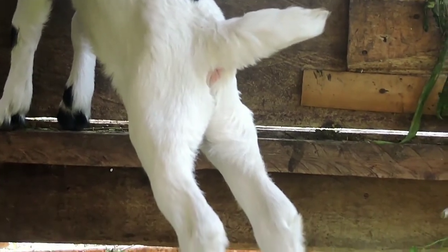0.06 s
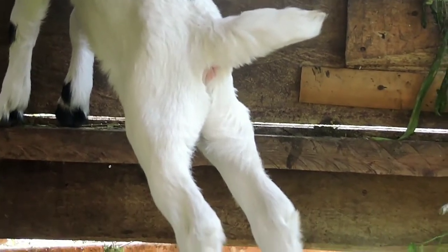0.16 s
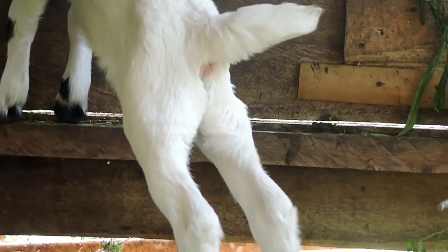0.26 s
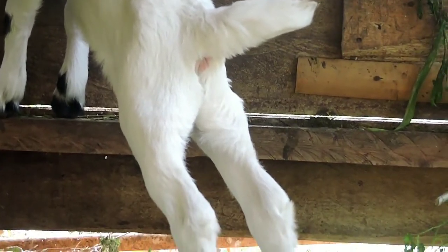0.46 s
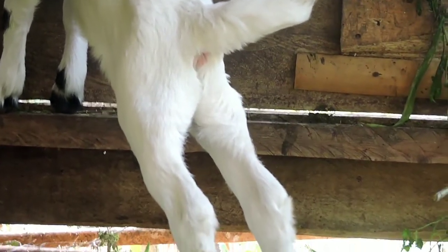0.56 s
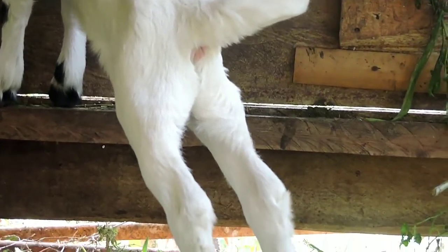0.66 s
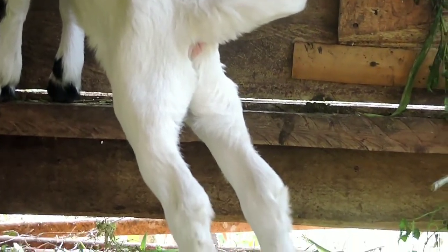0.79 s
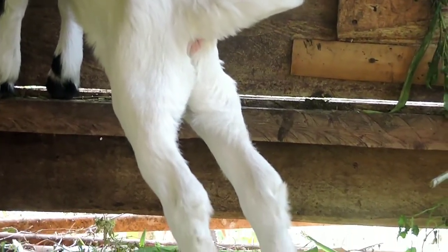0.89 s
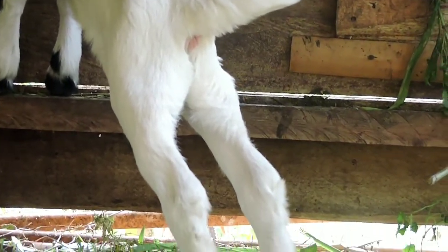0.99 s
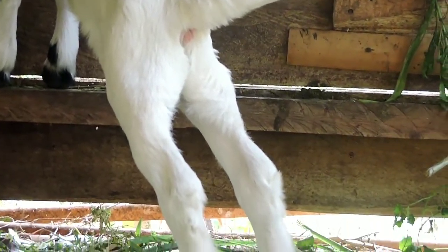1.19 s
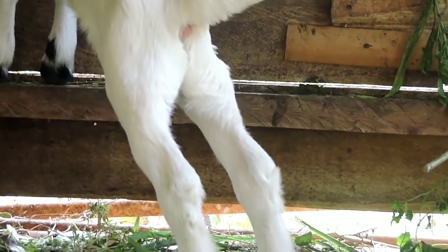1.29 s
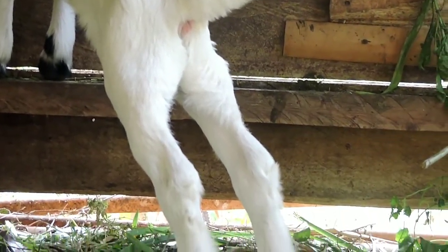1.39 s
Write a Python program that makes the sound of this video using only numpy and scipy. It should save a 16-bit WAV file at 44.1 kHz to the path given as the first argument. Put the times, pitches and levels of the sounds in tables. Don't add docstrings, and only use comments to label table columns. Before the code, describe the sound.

Two goat kids give short, trembling overlapping bleats in a wooden pen, followed by small hoof clicks.

```python
import sys
import numpy as np
from scipy import signal
from scipy.fft import rfft, irfft, next_fast_len
from scipy.io import wavfile
from scipy.ndimage import uniform_filter1d, map_coordinates

SR = 44100
rng = np.random.default_rng(int(sys.argv[2]) if len(sys.argv) > 2 else 0)


def convert_level_to_amplitude(level_db):
    exponent = np.asarray(level_db, float) / 20
    return 10 ** exponent


def inscribe(sig):
    pcm = np.round(np.clip(np.atleast_2d(sig).T, -1, 1) * 32767)
    wavfile.write(sys.argv[1], SR, pcm.astype(np.int16))


N = 63945
T = np.arange(N) / SR

# t/s, mean pitch f/Hz, level/dB, low resonances over
# middle/dB, top resonances over middle/dB
KID_BLEAT = [
    (.1, 400, -61, -20, -4),
    (.122, 396.5, -58, -20, 2),
    (.183, 421.4, -49, -9, -5),
    (.203, 432.7, -36, -13, -14),
    (.214, 448.9, -53.5, 4, -4),
             (0.241, 467.7, -41, -4, -7),
    (0.25, 464.5, -38.5, 4, 7.5),
    (0.402, 471.6, -37.5, 1, 1),
    (0.469, 482.9, -38, -3.5, 1.5),
    (0.629, 484.8, -38, -5, -2.5),
    (0.701, 477.1, -43.5, 2, 3.5),
    (0.774, 473.8, -46, -6, -1),
    (.828, 424.7, -43.5, 4.5, -4),
    (0.863, 447, -44, 1.5, 3),
    (0.893, 450.8, -42, -11, -10),
]
MATE_SHAPE = [
    (.41, 276, -62, 0, -2),
    (.445, 286, -55.5, 2, 6),
    (.51, 296, -46.5, 0.5, 6),
    (.56, 308.6, -52, 3, -20),
    (.62, 306, -49.5, 5.5, 2),
    (.7, 308.1, -49, 0, 0.5),
    (.77, 309.4, -47, 1, -6),
    (.84, 312.5, -50.5, -8, -2),
    (.87, 312.6, -47, -8, 6),
    (.898, 312, -45.5, -18, -2),
]
# t/s of highest pitch, swing f/Hz, level change there/dB (minus: voice catches, plus: it pushes)
KID_QUAVERS = [
    (.14, 1, 0),
    (.232, 9, -2),
    (.334, 16, -14),
    (.438, 12, -15),
    (.547, 6, -12),
    (.642, 3, -8),
    (.755, 10, -3),
    (.87, 3, 0),
    (.97, 1, 0),
]
MATE_QUAVERS = [
    (.36, 5, 3),
    (.455, 7, 6),
    (.553, 11, 6),
    (.662, 8, 7),
    (.76, 9, 8),
    (.85, 5, 4),
    (.95, 5, 0),
]
# f/Hz, width/Hz, level/dB
KID_LOW = [(934.6, 80, -2.5), (1406, 54, 2.5), (1788.4, 44.5, -1.5)]
KID_MIDDLE = [(1995, 79, -4.5), (2412, 65.6, 9), (2873, 141, -3)]
KID_TOP = [(3200, 110, -15), (3695, 101, -6.5), (4370, 820, -22.5), (5300, 1100, -26), (8340, 410, -32.5)]
MATE_LOW = [(661, 75, -0.5), (951, 105, 2), (1191, 67, 3), (1580, 76, 1)]
MATE_MIDDLE = [(2044, 123, -1.5), (2604, 100, 6)]
MATE_TOP = [(3211, 490, -13.5), (4000, 843, -18), (6300, 2800, -29.5)]
# f/Hz, left over right/dB
KID_SIDE = [(900, 17), (1400, 6), (2400, 10), (3700, 7), (8000, -2.5)]
MATE_SIDE = [(600, 8), (1200, 12.2), (1600, 12.2), (2500, 3.9), (4000, 4.7)]
# t/s, level/dB, dying time/s, brightness/(dB per octave), left over right/dB
HOOF_STEPS = [(.078, -56.5, 0.063, 1, 5), (.1, -55.5, 0.022, 3.5, 3.5), (0.946, -47.5, 0.0065, 4, 7),
              (1.034, -48, .01, -2, 7), (1.047, -53, 0.0086, -6.5, 8), (1.126, -43, 0.0053, 4, 4.5),
              (1.136, -51, 0.0071, -6.5, 18), (1.2014, -43, 0.0042, 5.5, 1), (1.214, -52, 0.011, -4, 18.5),
              (1.227, -55, 0.011, 4.5, -5), (1.27, -49.5, 0.0072, 6.5, -3), (1.291, -53, 0.02, -6, 10.5),
              (1.319, -53.5, 0.0058, 6, -5), (1.368, -68.5, 0.027, -7, -9)]
# f/Hz, width/Hz, level/dB
BOARD = [(765, 280, 6.5), (1640, 435, 4), (2530, 560, -0.5), (3510, 1550, -9.5), (7900, 4500, -27)]
# delay t/s, left level/dB, right level/dB
WALLS = [
    (.0023, -12.5, -20.5),
    (.0047, -17.5, -10),
    (.0081, -16, -12),
    (0.0133, -13.5, -5),
    (.019, -20.5, -17.5),
]
# f/Hz, time to fall 60 dB t/s
PEN_TAIL = [(300, .18), (2000, .15), (10000, .08)]
# f/Hz, level/dB per Hz
HUSH = [(12, -33), (22, -1.5), (32, 4.5), (50, -4), (130, -6.5), (1100, -6), (2200, -10), (4500, -20.5),
        (15600, -34)]
# f/Hz, left-right likeness (0 to 1)
ALIKE = [(30, .7), (100, 0.15), (1000, 0.067), (8000, 0.034)]

JITTER, SHIMMER_DB = .0045, 1.5
QUICK_FALL = .1
SWELL_DB, SWELL_LEAD = 4, .07
TOP_SWELL = 2.2
CATCH_LAG_S, RELEASE_S = .005, .01
PATCHY_DB, PATCH_RATE_HZ = 2.2, 30
ROUGH, ROUGH_AT_END, ROUGH_S = .05, .18, .1
NASAL_S, NASAL_WIDE_S = .225, .016
FLOOR_HZ = 558
HOOF_ATTACK_S, SCRAPE_DB = .0013, 2
LEAD_S = .00009
PEN_DB, HUSH_DB = -13, -52
TOP_HZ = 15780
LEFT_RIGHT = np.array([[.5], [-.5]])


def bleat(shape, quavers, throat, side, nasal_db, catch_s, hoarse):
    times, *columns = np.transpose(shape)
    start, end = times[0], times[-1]
    pitch, level_db, low_db, top_db = [np.interp(T, times, column) for column in columns]

    peaks, swings, catch_db = np.transpose(quavers)
    turn = np.interp(T, peaks, np.arange(len(peaks)))
    swing = np.interp(T, peaks, swings)
    skewed = turn + QUICK_FALL * np.sin(np.pi * turn) ** 2
    pitch = pitch + swing * np.cos(2 * np.pi * skewed)
    since_catch = T - peaks[:, None] - CATCH_LAG_S
    catches = catch_db[:, None] * np.exp(-(since_catch / catch_s) ** 2 / 2)
    level_db = level_db + catches.sum(0) + SHIMMER_DB * wobble(60.74)
    swell_db = SWELL_DB * np.cos(2 * np.pi * (turn + SWELL_LEAD)) * swing / swing.max()

    phase = 2 * np.pi * np.cumsum(pitch * (1 + JITTER * wobble(119.35))) / SR
    rough = ROUGH * hoarse + ROUGH_AT_END * np.exp(-np.maximum(end - T, 0) / ROUGH_S)
    gate = (T > start) * np.exp(-np.maximum(T - end, 0) / RELEASE_S)
    folds = vocal_folds(phase, rough) * convert_level_to_amplitude(level_db + 10) * gate

    shares_db = low_db, swell_db, top_db + TOP_SWELL * swell_db
    voice = sum(filtered(folds * convert_level_to_amplitude(share_db), resonances(rows))
                for share_db, rows in zip(shares_db, throat))
    nasal_swell = np.exp(-((T - NASAL_S) / NASAL_WIDE_S) ** 2 / 2)
    voice = voice + convert_level_to_amplitude(nasal_db) * np.cos(phase) * nasal_swell
    return filtered(voice, lambda f: convert_level_to_amplitude(along(side, f) * LEFT_RIGHT))


def vocal_folds(phase, rough):
    overtones = (convert_level_to_amplitude(PATCHY_DB * wobble(PATCH_RATE_HZ)) * np.cos(k * phase) for k in range(1, 26))
    pulses = unit(sum(overtones))
    puffs = unit((1 + np.cos(phase)) * rng.standard_normal(N))
    return np.sqrt(1 - rough) * pulses + np.sqrt(rough) * puffs


def hooves():
    steps = np.zeros((2, N))
    for start, level_db, dying_s, bright_db, side_db in HOOF_STEPS:
        since = T - start
        envelope = np.clip(since / HOOF_ATTACK_S, 0, 1) * np.exp(-np.maximum(since, 0) / dying_s)
        grit = envelope * rng.standard_normal(N) * convert_level_to_amplitude(SCRAPE_DB * wobble(250))

        def plank(f):
            octaves = np.log2(np.clip(f, 400, 7000) / 1500)
            return resonances(BOARD)(f) * convert_level_to_amplitude(bright_db * octaves)

        steps += filtered(grit, plank) * convert_level_to_amplitude(level_db + 12 + side_db * LEFT_RIGHT)
    return steps


def pen(x):
    def early(f):
        response = np.exp(-2j * np.pi * f * LEAD_S * np.array([[0], [1]]))
        for delay, left_db, right_db in WALLS:
            delays = delay * np.array([[1], [1.13]])
            response = response + convert_level_to_amplitude(np.array([[left_db], [right_db]])) * np.exp(-2j * np.pi * f * delays)
        return response

    hz, t, noise = signal.stft(rng.standard_normal((2, SR // 3)), SR, nperseg=256)
    decay = convert_level_to_amplitude(-60 * t / along(PEN_TAIL, hz)[:, None])
    tail = signal.istft(noise * decay, SR, nperseg=256)[1]
    tail = tail / np.linalg.norm(tail[0])
    delayed = np.pad(x, ((0, 0), (600, 0)))
    late = signal.fftconvolve(delayed, tail, axes=1)[:, :N]
    return filtered(x, early) + convert_level_to_amplitude(PEN_DB) * late


def hush():
    noise = signal.stft(rng.standard_normal((2, N)), nperseg=512)[2]
    patches = uniform_filter1d(rng.standard_normal(noise.shape[1:]), 6, 0)
    patches = unit(uniform_filter1d(patches, 10, 1))
    pair = signal.istft(noise * convert_level_to_amplitude(1.37 * patches), nperseg=512)[1][:, :N]

    def colour(f):
        angle = np.arccos(np.clip(along(ALIKE, f), -1, 1)) / 2
        return convert_level_to_amplitude(along(HUSH, f)) * np.array([np.cos(angle), np.sin(angle)])

    mid, side = filtered(pair, colour)
    return unit(np.array([mid + side, mid - side])) * convert_level_to_amplitude(HUSH_DB + 1.6 * LEFT_RIGHT)


def resonances(rows):
    def response(f):
        low_cut = (1j * f / (FLOOR_HZ + 1j * f)) ** 2
        ringing = sum((-1) ** k * convert_level_to_amplitude(db) * 1j * f * width / (centre ** 2 - f * f + 1j * f * width)
                      for k, (centre, width, db) in enumerate(rows))
        return low_cut * ringing
    return response


def filtered(x, response):
    size = next_fast_len(N + SR // 2)
    return irfft(rfft(x, size) * response(np.fft.rfftfreq(size, 1 / SR)), size)[..., :N]


def along(points, hz):
    f, value = np.transpose(points)
    return np.interp(np.log(hz + 1), np.log(f + 1), value)


def wobble(rate):
    knots = rng.standard_normal(int(N * 400 / SR) + 9)
    return map_coordinates(knots, [T * min(rate, 400)])


def unit(x):
    return x / np.sqrt(np.mean(x ** 2) + 1e-20)


def scene():
    kid = bleat(KID_BLEAT, KID_QUAVERS, (KID_LOW, KID_MIDDLE, KID_TOP), KID_SIDE,
                nasal_db=-61, catch_s=.005, hoarse=1)
    mate = bleat(MATE_SHAPE, MATE_QUAVERS, (MATE_LOW, MATE_MIDDLE, MATE_TOP), MATE_SIDE,
                 nasal_db=-np.inf, catch_s=.016, hoarse=2.5)
    return pen(kid + mate + hooves()) + hush()


def top_cut(x):
    return signal.sosfilt(signal.butter(12, 15780, fs=SR, output="sos"), x)


def record(dry):
    mix = filtered(dry, lambda f: f < TOP_HZ)
    return top_cut(mix)


dry = scene()
out = record(dry)
inscribe(out)
```